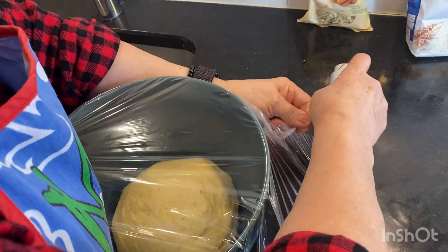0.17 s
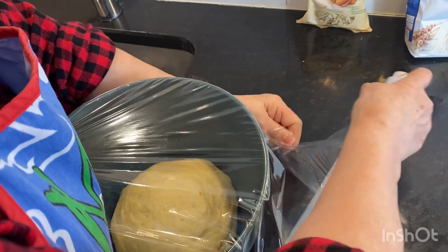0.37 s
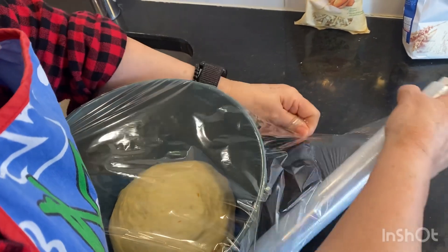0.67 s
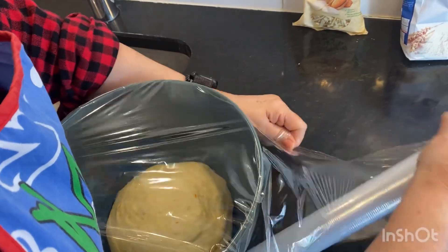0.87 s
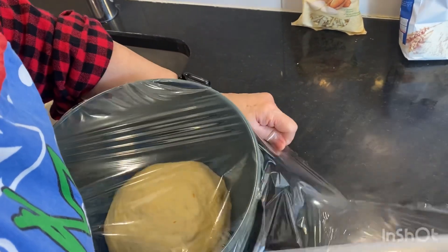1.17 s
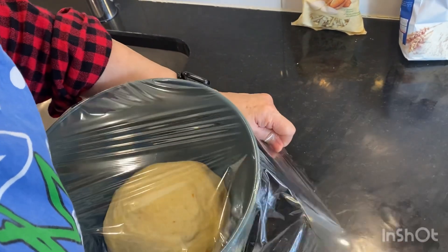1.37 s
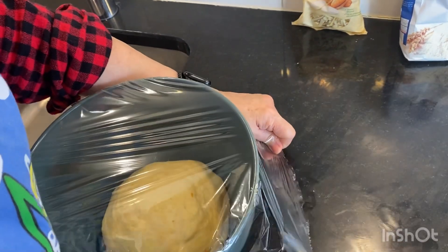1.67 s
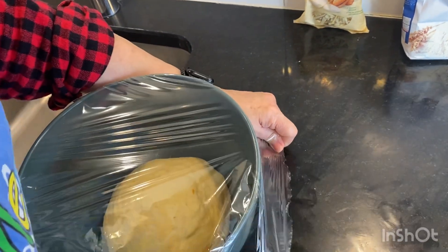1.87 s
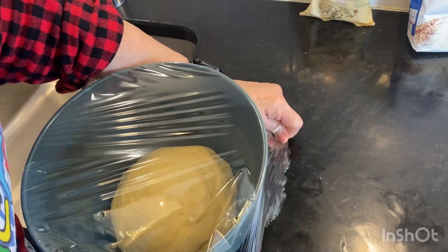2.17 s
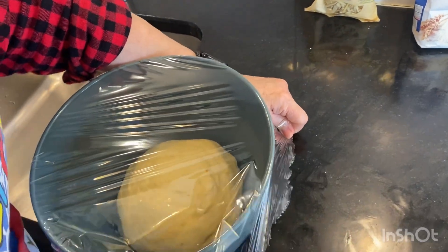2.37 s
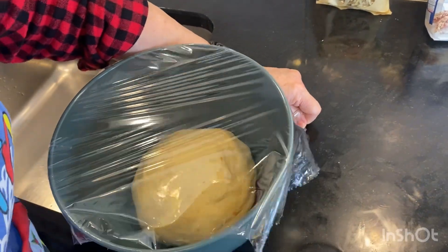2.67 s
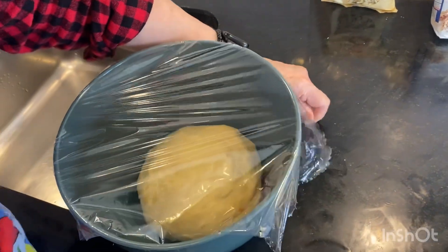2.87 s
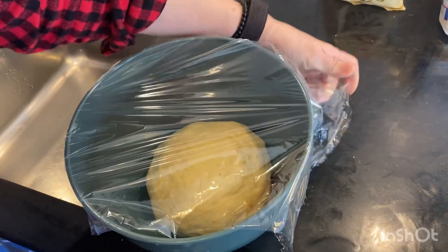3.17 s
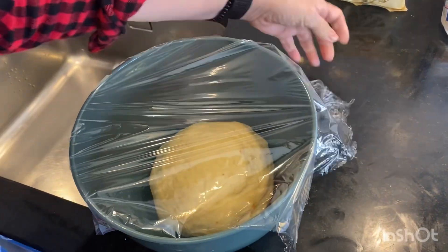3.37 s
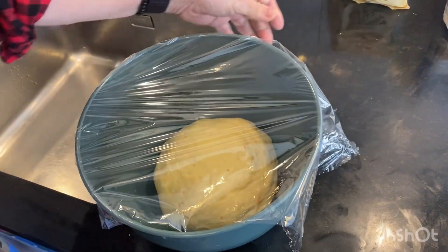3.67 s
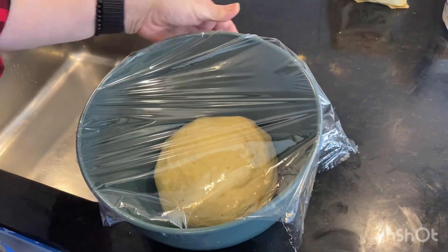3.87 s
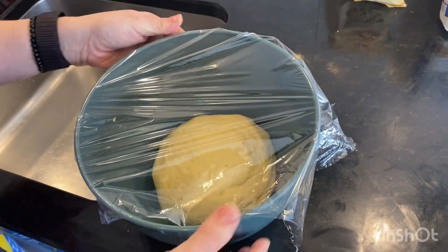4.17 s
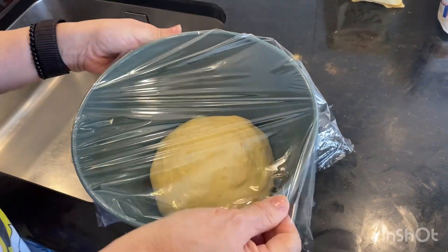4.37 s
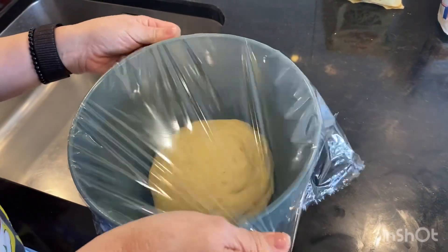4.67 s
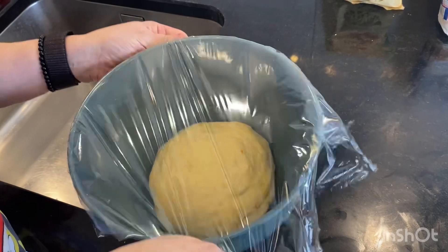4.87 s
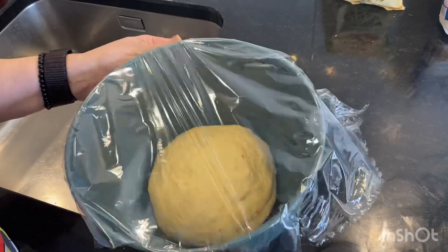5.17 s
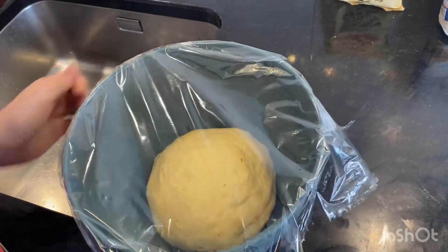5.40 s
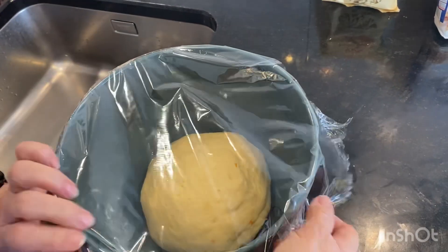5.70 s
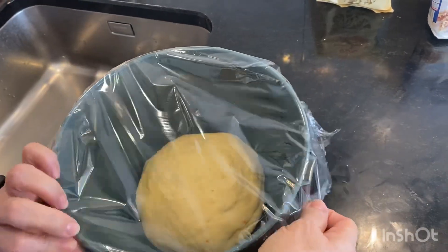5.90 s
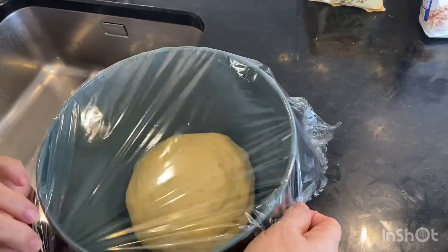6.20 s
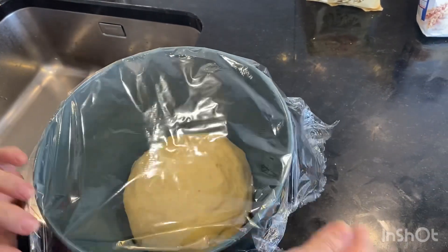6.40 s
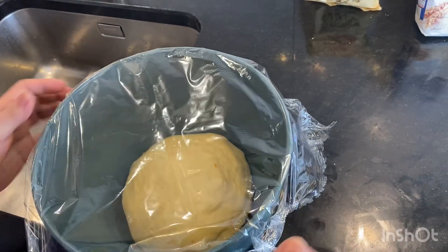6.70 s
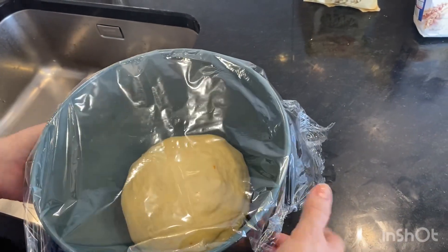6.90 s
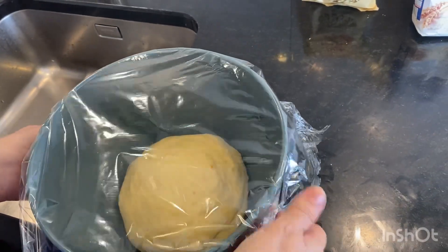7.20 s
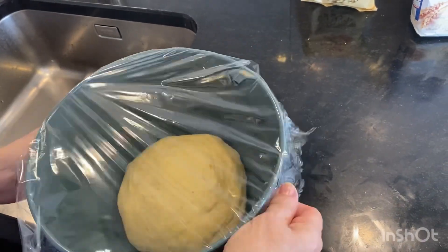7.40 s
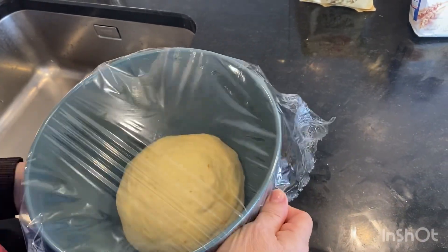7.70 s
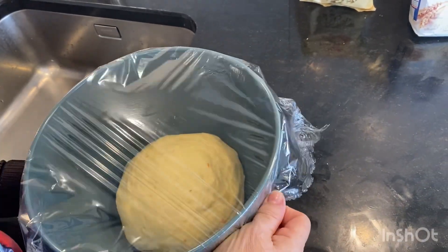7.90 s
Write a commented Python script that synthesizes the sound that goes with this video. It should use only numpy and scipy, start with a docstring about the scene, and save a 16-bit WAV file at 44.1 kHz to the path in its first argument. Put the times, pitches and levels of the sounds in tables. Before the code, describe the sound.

Cling film snaps off its roll, the roll clatters on a stone counter, then film crinkles and stretches over a bowl in a quiet kitchen.

```python
"""Cling film in a quiet kitchen

Cling film is torn off its roll, the roll drops and rattles on a stone counter, then the film is stretched over a bowl.
Snaps, roll and bowl are clicks and noise bursts with ringing modes; creases rustle and tick under the hands.
The bowl slides and knocks, low booms and a short echo answer, and a quiet kitchen rumbles and hisses behind.
Two microphone ports hear it all, most alike at the very top and least alike near 2 kHz."""
import sys
import numpy as np
from scipy import signal
from scipy.fft import rfft, irfft, next_fast_len
from scipy.io import wavfile

SR = 44100
rng = np.random.default_rng(int(sys.argv[2]) if len(sys.argv) > 2 else 0)


def put_to_file(sound):
    """Save the sound as 16-bit audio at rate SR, in the file named by the first command-line argument."""
    columns = np.atleast_2d(sound).T  # one column per channel
    safe = np.clip(columns, -1, 1)
    whole_steps = np.round(safe * 32767)
    wavfile.write(sys.argv[1], SR, whole_steps.astype(np.int16))


N = 355005

# Modes of the bowl. Each row: pitch in Hz, relative level in dB, time to fall by 60 dB in s.
BOWL_MODES = [(257, -7, 0.33), (359, -4.5, 0.042), (384, -2, 0.11), (529, -2, 0.21), (880, -10, 0.06),
              (1020, -3.5, 0.12), (1490, -12, .1), (2085, 1.5, 0.054)]
# Hands on the film. Each row: time in s, rustle level in dB, level of the sliding, drumming bowl in dB.
HANDS = [(0, -57, -64), (.25, -48, -56), (0.549, -56.5, -59.5), (.88, -51.5, -54), (1.001, -55.5, -49),
         (1.4, -55.5, -37.5), (1.75, -61, -55.5), (2.0, -58.5, -57), (2.198, -66, -70), (2.42, -60, -70.5),
         (2.699, -53, -63.5), (2.999, -56.5, -62.5), (3.301, -63, -61.5), (3.36, -79, -73.5),
         (3.66, -75, -75), (3.75, -48, -38), (3.88, -58, -45), (4.05, -64, -52), (4.25, -52.5, -62.5),
         (4.55, -49, -46), (4.78, -56, -58.5), (4.881, -46.5, -43.5), (5.001, -59, -58), (5.12, -53, -63),
         (5.22, -48, -58), (5.28, -69, -66.5), (5.5, -67, -64), (5.56, -59, -59), (5.85, -48, -55.5),
         (6.12, -47, -45.5), (6.25, -53, -56.5), (6.42, -58.5, -65.5), (6.46, -72.5, -68),
         (6.711, -94.5, -85.5), (6.751, -56.5, -66), (6.93, -62.5, -67.5), (6.999, -48, -53),
         (7.12, -54.5, -56), (7.25, -51, -50), (7.38, -43.5, -49), (7.5, -48.5, -50), (7.62, -54, -56),
         (7.75, -49, -54), (7.88, -51, -65), (7.94, -45.5, -58), (8.0, -39.5, -43.5), (8.05, -58, -53)]
# How alike the two ports hear a sound. Each row: frequency in Hz, likeness from 0 (unrelated) to 1 (same).
PORT_LIKENESS = [(60, 0.79), (200, 0.7), (700, .6), (2000, 0.088), (4000, 0.52), (5200, 0.32), (7000, 1),
                 (12000, 1)]


def from_db(db):
    """Gain of a level in dB."""
    return 10 ** (np.asarray(db) / 20)


def rms_one(x):
    """Scaled to rms 1."""
    return x / np.sqrt(np.mean(x ** 2) + 1e-20)


def at_hz(points, hz):
    """A table read on a log-frequency axis."""
    table_hz, values = np.transpose(points)[:2]
    return np.interp(np.log(hz), np.log(table_hz), values)


def drift(rate_hz):
    """Slow chance of spread 1: noise at every 40th sample through two one-pole low-passes at rate_hz."""
    r = np.exp(-2 * np.pi * rate_hz * 40 / SR)
    noise = rng.standard_normal(N // 40 + 2002)
    slow = signal.lfilter([1], [1, -2 * r, r * r], noise)[2000:]     # skip the filter's start
    return np.interp(np.arange(N) / 40, np.arange(len(slow)), rms_one(slow))


def bands():
    """Half-octave band-passes from 28 Hz up, with their centres in Hz."""
    edges = 28 * 2 ** np.arange(0, 9.6, .5)
    return [(np.sqrt(lo * hi), signal.butter(2, [lo, hi], "band", fs=SR, output="sos"))
            for lo, hi in zip(edges, edges[1:])]


def at_ports(mid, side, alike):
    """Left and right ports from what they share (mid) and what sets them apart (side)."""
    return np.sqrt(1 + alike) * mid + np.sqrt(1 - alike) * side * [[1], [-1]]


def coloured(sources, spectrum, patchy_db):
    """Two mid-side pairs, taken in turn by the bands, into stereo of rms 1; each band swells on its own."""
    out = 0
    for k, (hz, sos) in enumerate(bands()):
        mid, side = signal.sosfilt(sos, sources[k % 2])
        alike = np.clip(at_hz(PORT_LIKENESS, hz), 0, 1)
        gain = from_db(at_hz(spectrum, hz) + patchy_db * drift(47))
        out = out + gain * at_ports(mid, side, alike)
    return rms_one(out)


def hands_db():
    """Rustle and slide levels in dB, drawn from point to point along the handling."""
    s, rustle_db, slide_db = np.transpose(HANDS)
    t = np.arange(N) / SR
    return np.interp(t, s, rustle_db), np.interp(t, s, slide_db)


def blows(rows, kind, focus_db, pop_db, modes, ring_db, dying_s, low_drag, crack, wide):
    """Each blow is a sharp click and a dying noise burst, struck modes and a pop; dying_s is the t60 at 3 kHz."""
    focus_octaves = 0.5     # a blow is fuller around the pitch of its pop
    pop_t60_s, pop_drag = 0.044, 0.32     # decay of a 1 kHz pop; lower pops last longer
    out, t, bank = np.zeros((2, N + SR)), np.arange(SR // 4) / SR, bands()[2:]
    kind_hz, kind_db, low_share, high_share = np.transpose(kind)
    for s, peak_db, thud_db, sizzle_db, pop_hz in rows:
        colour_db = peak_db + kind_db + low_share * thud_db + high_share * sizzle_db
        colour = np.c_[kind_hz, colour_db]
        noise, sound = rng.standard_normal((2, 2, len(t))), 0
        for k, (hz, sos) in enumerate(bank):
            t60 = dying_s * (3000 / hz) ** low_drag     # lows last longer
            build = 1 - np.exp(-t / (0.031 * t60))     # the contact takes a moment
            mid, side = noise[k % 2] * build * from_db(-60 * t / t60)
            # the body is broad: each port hears it a little differently
            burst = mid + wide * side * [[1], [-1]]
            # alternate signs let neighbouring bands add up to one click
            burst[:, 30] += crack * (-1) ** k
            fall_db = 14 * min(0, np.log2(hz / kind_hz[0]))     # little below the thump
            near_db = focus_db * np.exp(-(np.log2(hz / pop_hz) / focus_octaves) ** 2)
            gain = from_db(at_hz(colour, hz) + fall_db + near_db) * np.sqrt(SR / hz)
            sound = sound + signal.sosfilt(sos, burst) * gain
        for (hz, level_db, t60), luck in zip(modes, rng.standard_normal(len(modes))):
            mode_db = at_hz(colour, hz) + level_db + ring_db + 3.7 * luck
            sound = sound + from_db(mode_db - 60 * t / t60) * np.sin(2 * np.pi * hz * t)
        # the struck spot pops briefly at a pitch of its own
        pop_fall_db = 60 * t / pop_t60_s * (pop_hz / 1000) ** pop_drag
        pop_gain = from_db(at_hz(colour, pop_hz) + pop_db - pop_fall_db)
        sound = sound + pop_gain * np.sin(2 * np.pi * pop_hz * t)
        at = round(s * SR)
        out[:, at:at + len(t)] += sound
    return out[:, :N]


def film_snaps():
    """The film lets go in bright, wide snaps that faintly ring the bowl's modes."""
    # Each row: start in s, peak level in dB, thud (100-500 Hz) and sizzle (over 4 kHz) in dB against the peak,
    # pitch of the pop in Hz.
    snap_rows = [(0.056, -35, -36, -10, 1780), (0.084, -32, -25, -7, 1730), (0.097, -17, -38, -17, 2945),
                 (0.162, -30, -32, -4, 1300), (0.206, -37, -45, 2.5, 7160), (0.212, -25.5, -35, -26, 1530),
                 (0.218, -36, -43, -6, 7200), (0.272, -5, -42, -17.5, 6620), (0.391, -35.5, -20, -14, 1300),
                 (0.54, -38.5, -27, -5.5, 1980), (0.784, -32, -22, -11.5, 580),
                 (1.842, -41.5, -35, 1.5, 2620), (1.923, -34.5, -34, -5, 1206),
                 (2.259, -42, -32, -11.5, 6780), (2.282, -37, -45, -5, 2880),
                 (2.346, -29.5, -53, -11.5, 5800), (2.44, -35, -60.5, -3, 7200),
                 (2.457, -35, -48, -9, 5960), (2.481, -33.5, -44, -10, 7400),
                 (2.506, -32.5, -43, -9.5, 5800), (2.515, -32, -39, -7, 6640), (2.528, -30, -42, -7, 4250),
                 (2.55, -32.5, -49, -6, 6400), (2.563, -26.5, -58, -10, 5930), (2.586, -32, -23, -8, 7180),
                 (2.61, -12, -9, -10.5, 2254), (3.06, -49, -21, -7.5, 6840), (3.101, -38, -23.5, -17, 6060),
                 (3.275, -46, -15.5, -13.5, 743), (4.361, -39, -24, -9.5, 1150),
                 (4.46, -27, -6.5, -5, 1020), (4.571, -37, -13, -27, 1900), (4.614, -33.5, -23, -11, 431),
                 (4.64, -31.5, -15, -13, 452), (5.15, -18.5, -23, -23.5, 2150), (5.992, -45, -26, -9, 6100),
                 (6.003, -33, -19, -6, 500), (6.049, -30.5, -14.5, -6, 530),
                 (6.324, -23.5, -9.5, -20, 2060), (6.963, -9, -25, -20, 559), (7.071, -15, -26, -24, 567),
                 (7.24, -30, -20, -21, 504), (7.452, -26, -31, -10.5, 7400), (7.472, -29, -34, -4, 970),
                 (7.614, -33, -10.5, -9.5, 510), (7.687, -29, -56, -7.5, 7740), (7.792, -42, -16, -9, 2470),
                 (7.961, -23.5, -15, -12, 1850), (7.993, -28, -12.5, -5.5, 486)]
    # Colour of a snap. Each row: frequency in Hz, level in dB against the peak,
    # share of the thud and share of the sizzle that reach this pitch.
    snap_colour = [(319, -2, 0.99, 0.01), (778, -10, 0.53, 0.016), (2400, -12.5, 0.099, 0.12),
                   (6460, 1.5, 0.11, 1.0)]
    return blows(snap_rows, snap_colour, 7.0, 5.8, BOWL_MODES,
                 ring_db=-16.0, dying_s=0.023, low_drag=0.13, crack=3.8, wide=0.43)


def crackle(per_s, spread_db, smooth):
    """Creases flip at random, in clumps, over a smooth rub."""
    born = rng.random(N) < per_s * from_db(5.0 * drift(25)) / SR
    sizes = born * from_db(spread_db * np.minimum(rng.exponential(1, N), 5))
    smear = np.exp(-np.arange(80) / 2.0)     # each flip lasts a fraction of a millisecond
    shape = rms_one(signal.fftconvolve(sizes, smear)[:N]) + smooth
    return shape * rng.standard_normal((2, 2, N))


def ticks():
    """Lone creases flip with a short pitched tick, at ten pitches from 2.5 to 13 kHz."""
    per_s, level_db, cycles = 70, -14, 9     # level against the rustle; cycles to fall by 60 dB
    flips = rng.random(N) < per_s / SR
    sizes = from_db(3.5 * np.minimum(rng.exponential(1, N), 3)) * flips
    pitches, dealt, out = np.geomspace(2500, 13000, 10), rng.integers(0, 10, N), 0
    for k, hz in enumerate(pitches):
        r, w = from_db(-60 * hz / cycles / SR), 2 * np.pi * hz / SR
        struck = sizes * (dealt == k) + 1e-18
        out = out + signal.lfilter([0, np.sin(w)], [1, -2 * r * np.cos(w), r * r], struck)
    return from_db(level_db) * rms_one(out)


def film_rustle(rustle_db):
    """Creases crackle over a smooth rub and tick here and there, as loud as the hands make them."""
    # Each row: frequency in Hz, relative level in dB per Hz.
    rustle_spectrum = [(400, -32), (800, -6), (1500, -6), (3000, -2.5), (5000, -3.5), (8000, -3.5),
                       (12000, -4.5), (16000, -5.5)]
    creases = coloured(crackle(350, spread_db=5.5, smooth=5.7), rustle_spectrum, patchy_db=1.5)
    swell_db = 2.2 * drift(16)
    return from_db(rustle_db + swell_db) * creases + from_db(rustle_db) * ticks()


def roll_rattle():
    """The roll bounces on the counter: hard clicks and bursts that ring the roll's modes."""
    # Each row: start in s, peak level in dB, thud (100-500 Hz) and sizzle (over 4 kHz) in dB against the peak,
    # pitch of the pop in Hz.
    roll_rows = [(1.004, 0.5, -25, -16.5, 1250), (1.031, -4.5, -16, -18, 2720),
                 (1.045, -1, -18, -21.5, 1270), (1.059, -3, -17, -16.5, 740),
                 (1.074, -0.5, -15.5, -13.5, 762), (1.108, -4, -16, -15.5, 767),
                 (1.247, -4, -14.5, -12, 942), (1.266, -17, 1.5, -10, 869), (1.289, -1.5, -24.5, -17, 947),
                 (1.304, -11, -16, -18.5, 902), (1.324, -17.5, -19.5, -11.5, 1180),
                 (1.377, -10, -20.5, -12.5, 953), (1.393, -18.5, -27, -16.5, 947),
                 (1.418, -10, -23.5, -17.5, 945), (1.45, -10, -20, -12, 950), (1.467, -22.5, -9, -20, 923),
                 (1.493, -8.5, -26.5, -12, 1380), (1.526, -23.5, 1.5, -16, 1410),
                 (1.536, -14.5, -15, -16.5, 875), (1.618, -10, -23, -16, 945)]
    # Colour of a bounce. Each row: frequency in Hz, level in dB against the peak,
    # share of the thud and share of the sizzle that reach this pitch.
    roll_colour = [(243, 3.5, 0.91, 0.22), (813, -8, 0.55, 0), (2400, -7.5, 0.14, 0.2), (5970, 2, 0, 0.98)]
    # Each row: pitch of a mode in Hz, relative level in dB, time to fall by 60 dB in s.
    roll_modes = [(118, -15.5, 0.032), (232, -1, 0.063), (371, 10.5, 0.045), (430, 4, 0.033),
                  (706, -5.5, .12), (749, 0, 0.21), (950, -4.5, 0.14), (1320, -9, .07), (1480, -15, .06),
                  (2575, -7, 0.041), (2570, -6.5, 0.093)]
    return blows(roll_rows, roll_colour, 3.0, 5.6, roll_modes,
                 ring_db=-7.0, dying_s=0.025, low_drag=0.2, crack=4.2, wide=0.13)


def bowl_knocks():
    """The bowl meets the counter or a hand: softer clicks, longer bursts and the bowl's modes."""
    # Each row: start in s, peak level in dB, thud (100-500 Hz) and sizzle (over 4 kHz) in dB against the peak,
    # pitch of the pop in Hz.
    knock_rows = [(0.918, -33.5, -13.5, -18, 381), (3.706, -8, -7, -27, 1447), (3.716, -4, -19, -23, 290),
                  (3.728, -11, -10.5, -21, 407), (3.906, -29, 3, -21, 399), (3.929, -25, -0.5, -30, 404),
                  (4.202, -36, -17.5, -32, 254), (4.51, -28.5, -5.5, -14, 363),
                  (4.854, -29.5, -27, -17, 2010), (5.206, -35, -10, -18.5, 339),
                  (5.618, -27.5, -14.5, -25.5, 232), (5.637, -39, -2, -25, 247),
                  (5.78, -25, -14.5, -19, 510), (5.933, -34.5, -10, -26, 507),
                  (6.018, -33.5, -22, -13, 517), (7.363, -31.5, -9, -16, 746)]
    # Colour of a knock. Each row: frequency in Hz, level in dB against the peak,
    # share of the thud and share of the sizzle that reach this pitch.
    knock_colour = [(345, 0, 0.96, 0.011), (800, -11, .2, 0.14), (2400, -8.5, 0, 0.51),
                    (6040, 2.5, 0.13, 0.96)]
    return blows(knock_rows, knock_colour, 2.4, 8.2, BOWL_MODES,
                 ring_db=-6.0, dying_s=0.058, low_drag=.3, crack=1.0, wide=0.13)


def through_bowl(x, share):
    """A rub on the bowl keeps its modes humming: a resonator for each mode joins the bare rub."""
    out = x.copy()
    for hz, level_db, t60 in BOWL_MODES:
        r = from_db(-60 / (t60 * SR))
        poles = [1, -2 * r * np.cos(2 * np.pi * hz / SR), r * r]
        out += share * from_db(level_db) * signal.lfilter([1 - r * r, 0, r * r - 1], poles, x)
    return rms_one(out)


def bowl_slide(slide_db):
    """The bowl slides and drums under the hands: dense low crackle that hums in its modes."""
    # Each row: frequency in Hz, relative level in dB per Hz.
    slide_spectrum = [(41, -32.5), (70, 2.5), (184, 2.5), (280, -4), (495, -5), (607, -6), (1070, -8),
                      (1800, -17), (2340, -49), (3960, -120)]
    rub = coloured(crackle(1400, spread_db=0.0, smooth=1.0), slide_spectrum, patchy_db=2.5)
    return from_db(slide_db + 0.83 * drift(45)) * through_bowl(rub, share=0.65)


def counter_booms():
    """The counter booms under a heavy blow or a leaning hand: soft low thumps that settle in pitch."""
    # Each row: start in s, level in dB ahead of its soft rise and decay, settled pitch in Hz.
    boom_rows = [(1.06, -33, 119), (1.257, -12.5, 122), (1.531, -32, 63.5), (1.95, -40.5, 49),
                 (2.614, -31.5, 101), (3.9, -50, 92.7), (4.515, -38, 61), (4.95, -45, 55.4),
                 (7.399, -48, 52), (8.0, -44, 58)]
    rise_s, die_cycles, sag = .012, 16.0, 0.29     # the pitch starts high by this share; 60 dB in so many cycles
    out, t = np.zeros(N + SR), np.arange(SR // 2) / SR
    rise = 1 - np.exp(-t / rise_s)
    for s, level_db, hz in boom_rows:
        cycles = hz * (t + sag * rise_s * rise)
        shape = rise * from_db(level_db - 60 * t * hz / die_cycles)
        at = round(s * SR)
        out[at:at + len(t)] += shape * np.sin(2 * np.pi * cycles)
    return out[:N]


def kitchen(x):
    """Stereo echo of decaying noise, each band with its own decay."""
    # Each row: frequency in Hz, time for the echo to fall by 60 dB in s.
    kitchen_t60 = [(100, 0.37), (300, 0.13), (800, .25), (2500, 0.2), (8000, 0.14)]
    t, echo = np.arange(SR // 2) / SR, 0
    white = rng.standard_normal((2, 2, len(t)))
    for k, (hz, sos) in enumerate(bands()):
        decay = from_db(-60 * t / at_hz(kitchen_t60, hz))
        mid, side = signal.sosfilt(sos, white[k % 2] * decay)
        alike = np.clip(at_hz(PORT_LIKENESS, hz) - .15, 0, 1)     # the echo comes from all around
        echo = echo + at_ports(mid, side, alike)
    echo = echo * np.clip(t / .004, 0, 1)     # the counter and walls answer within a few ms
    echo = echo / np.sqrt(np.sum(echo ** 2) / 2)
    return signal.fftconvolve(x[None], echo, axes=1)[:, :N]


def low_rumble(slide_db):
    """Steady low noise of the kitchen, joined by the counter booming along with the sliding bowl."""
    # Each row: frequency in Hz, relative level in dB per Hz.
    rumble_spectrum = [(25, -31.5), (40, -9.5), (52, 4.5), (68, -8), (90, -10.5), (130, -30), (200, -59)]
    steady_db, counter_db = -59, -10.5     # the counter's level is against the slide
    gain = np.hypot(from_db(steady_db), from_db(slide_db + counter_db))
    return gain * coloured(rng.standard_normal((2, 2, N)), rumble_spectrum, patchy_db=-0.3)


def quiet_hiss():
    """Faint broad noise behind everything, at -72 dB, its bands swelling each on their own."""
    # Each row: frequency in Hz, relative level in dB per Hz.
    hiss_spectrum = [(60, -8), (120, 1), (300, -8), (1000, -20.5), (4000, -23), (16000, -32.5)]
    return from_db(-72) * coloured(rng.standard_normal((2, 2, N)), hiss_spectrum, patchy_db=5.0)


def scene():
    """Blows ring in the kitchen; rustle and slide follow the hands over rumble and hiss."""
    # Where the hands work. Each row: time in s, left against right in dB.
    sideways = [(0, 1), (3.7, 1.5), (8, 2)]
    rustle_db, slide_db = hands_db()
    bass_cut = signal.butter(2, 75, "high", fs=SR, output="sos")
    hits = signal.sosfilt(bass_cut, film_snaps() + roll_rattle() + bowl_knocks())
    echo = from_db(-7.5) * kitchen(hits.mean(0))
    left_right_db = np.interp(np.arange(N) / SR, *np.transpose(sideways))
    pan = from_db(left_right_db * [[.5], [-.5]])
    near = hits + echo + film_rustle(rustle_db) + bowl_slide(slide_db) + counter_booms()
    return near * pan + low_rumble(slide_db) + quiet_hiss()


def record(dry):
    """Microphone treble, late treble in the left port, rounded peaks, then the bass and top cut."""
    # Each row: frequency in Hz, microphone level in dB.
    mic_treble = [(6000, 0), (9000, -1), (12000, -1.5), (16000, -2)]
    # Each row: frequency in Hz, phase turn in radians that makes the left port's treble late.
    left_turn = [(7050, 0), (15330, -4 * np.pi)]
    size = next_fast_len(N)
    hz = np.arange(size // 2 + 1) * SR / size
    turn = np.interp(hz, *np.transpose(left_turn))
    ports = from_db(at_hz(mic_treble, hz + 1)) * np.exp(1j * turn * [[1], [0]])
    heard = irfft(rfft(dry, size) * ports, size)[:, :N]
    rounded = 1.323 * np.tanh(heard / 1.713)
    bass_cut = signal.butter(4, 38, "high", fs=SR, output="sos")
    top_cut = signal.cheby2(14, 70, 16400, fs=SR, output="sos")     # 70 dB down from 16.4 kHz up
    return signal.sosfilt(top_cut, signal.sosfilt(bass_cut, rounded))


dry = scene()
out = record(dry)
put_to_file(out)
```